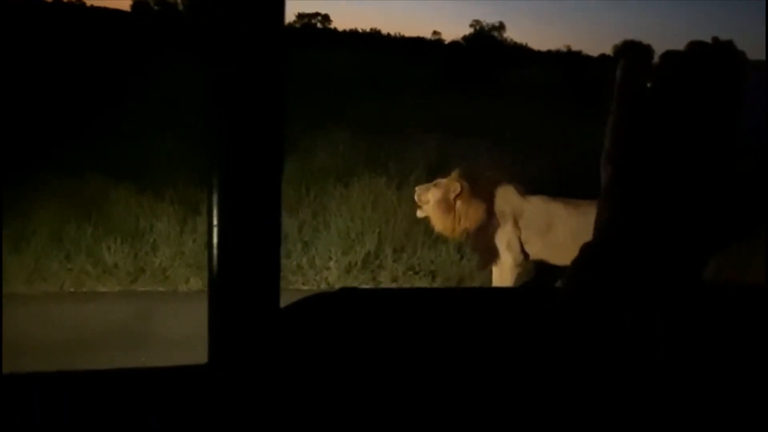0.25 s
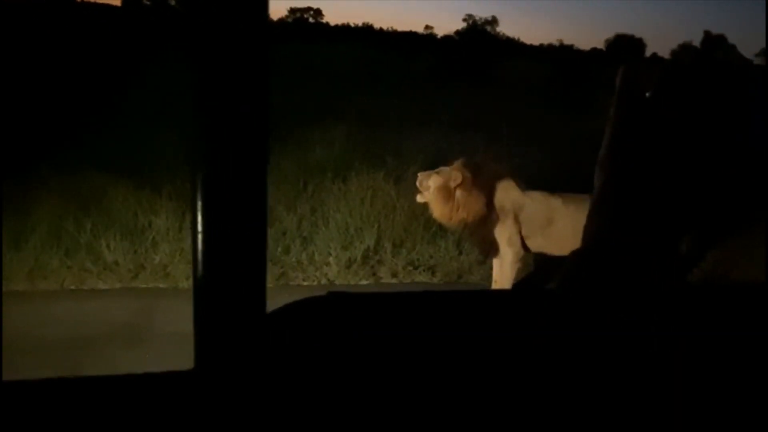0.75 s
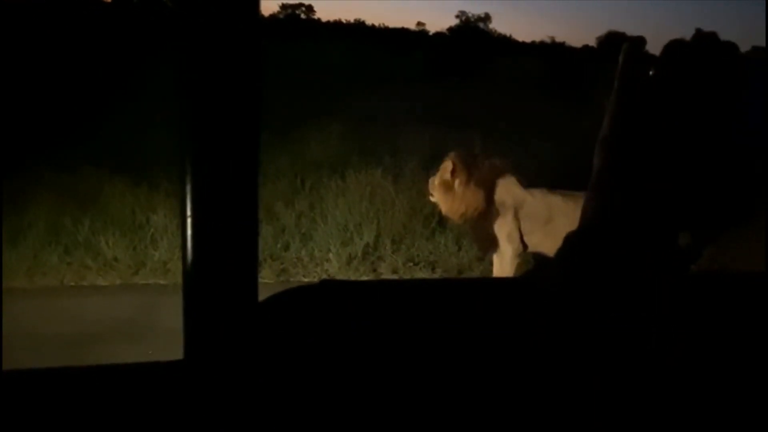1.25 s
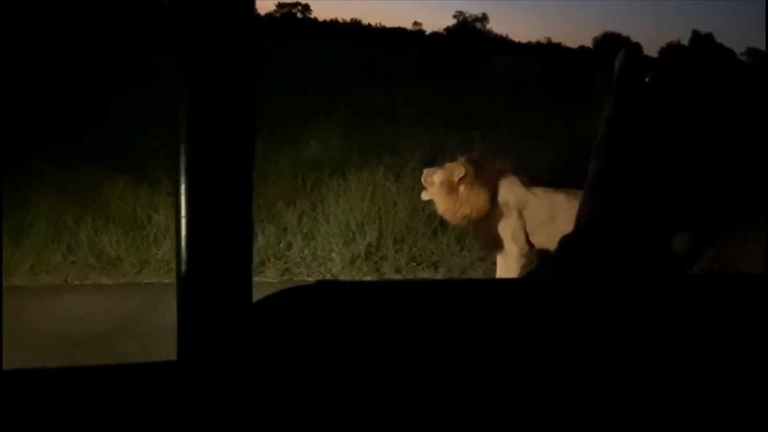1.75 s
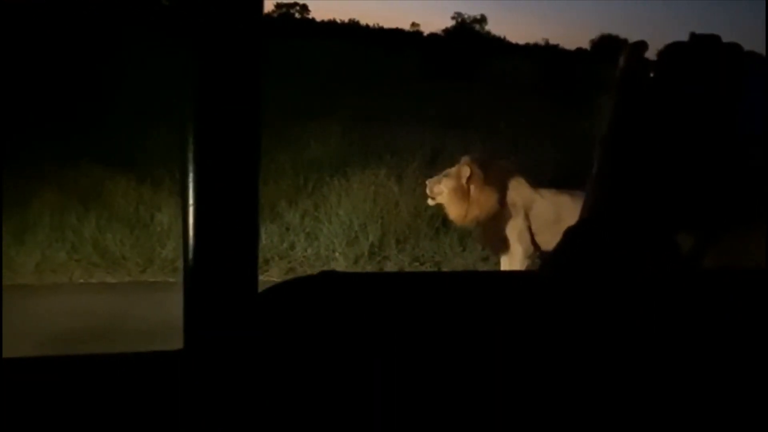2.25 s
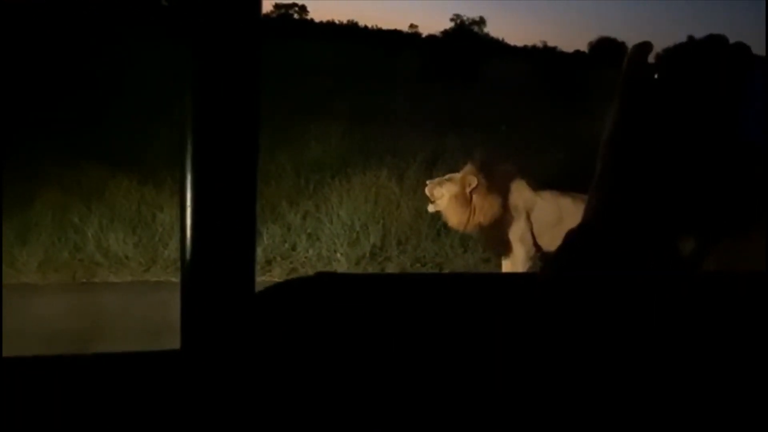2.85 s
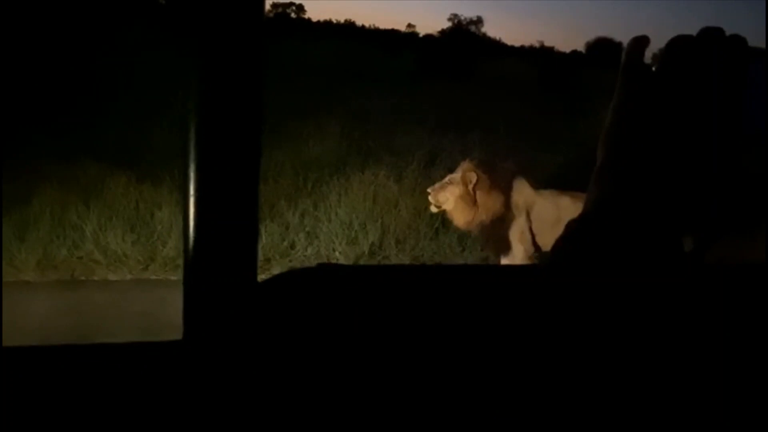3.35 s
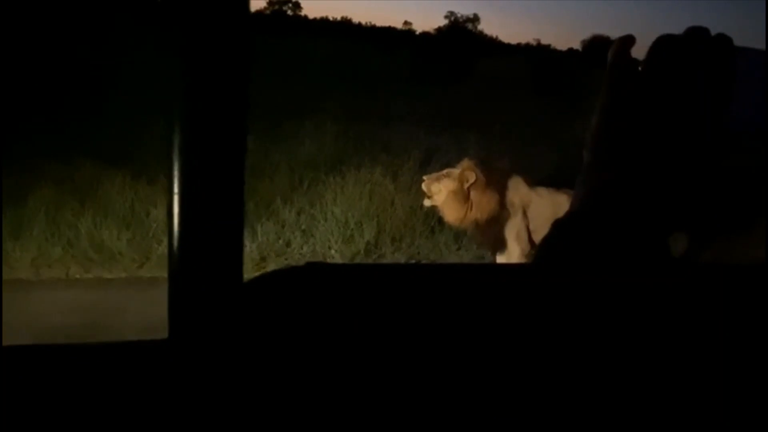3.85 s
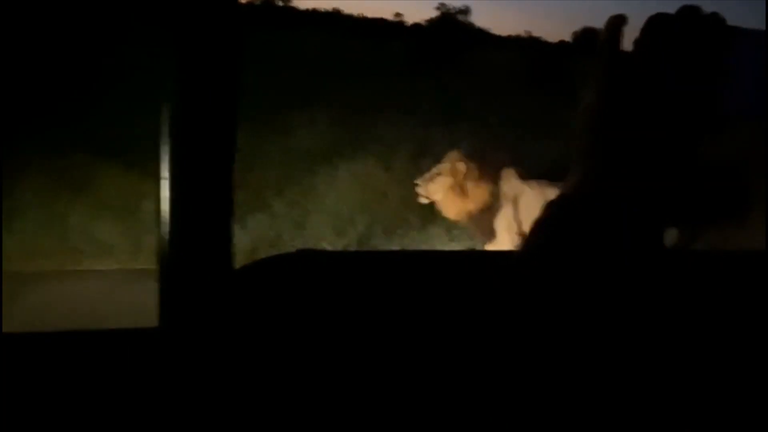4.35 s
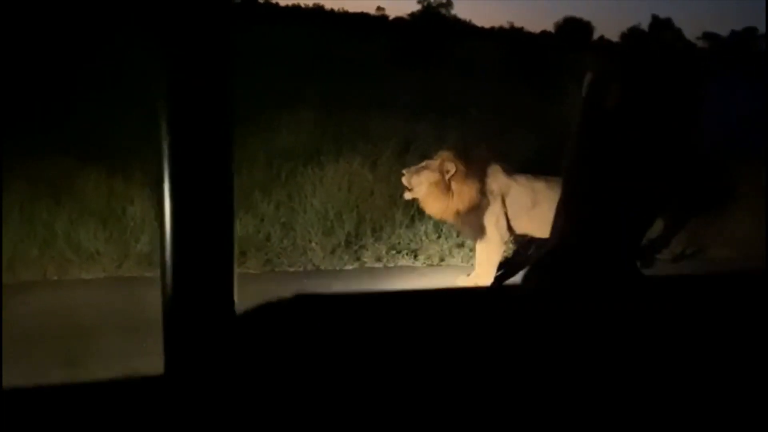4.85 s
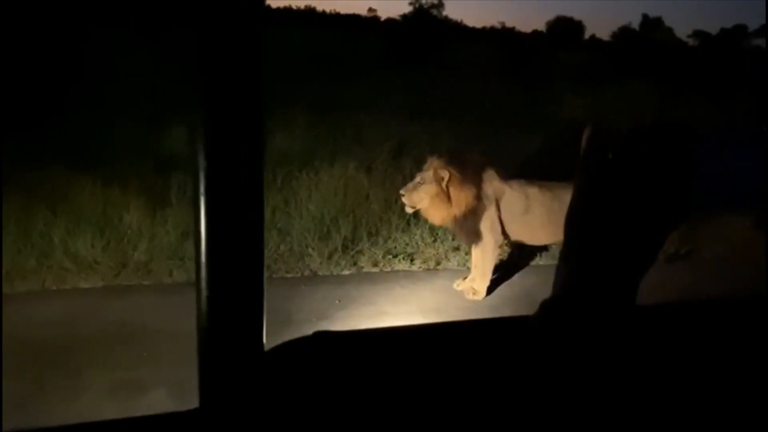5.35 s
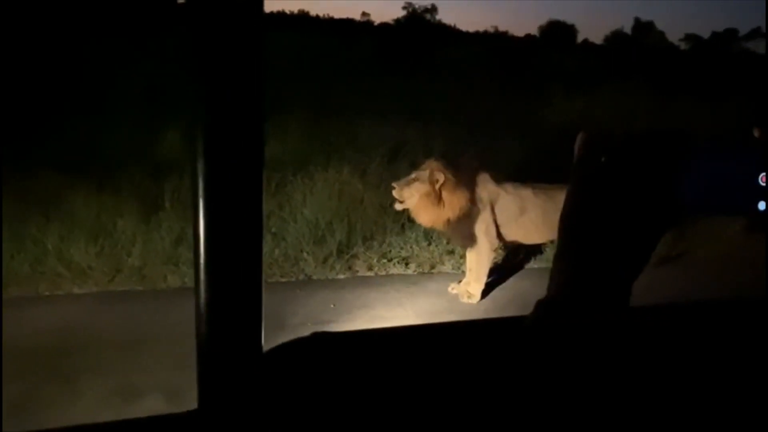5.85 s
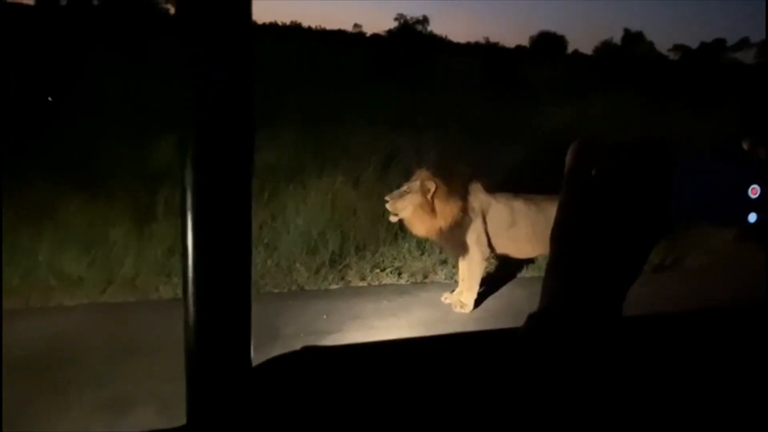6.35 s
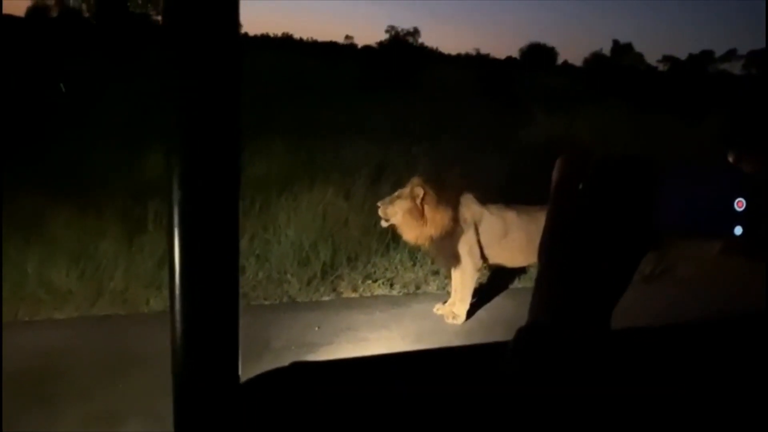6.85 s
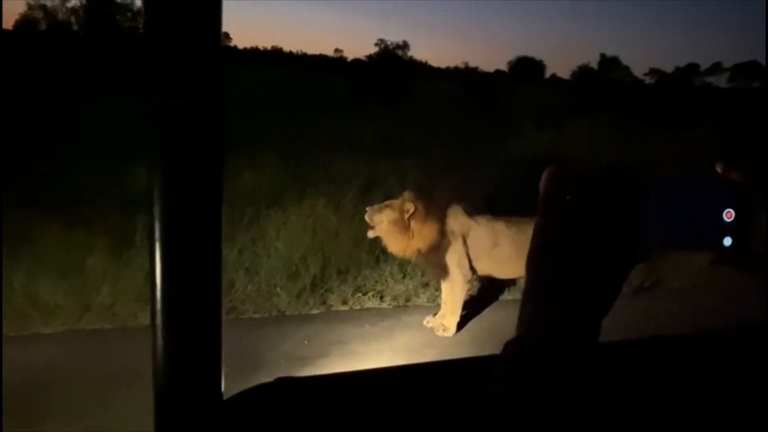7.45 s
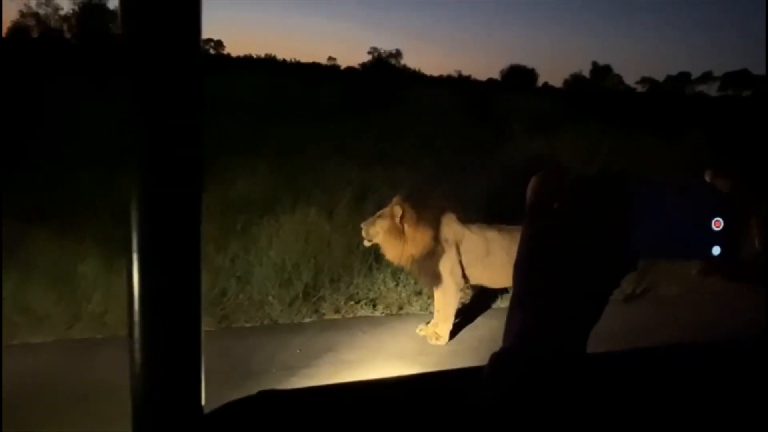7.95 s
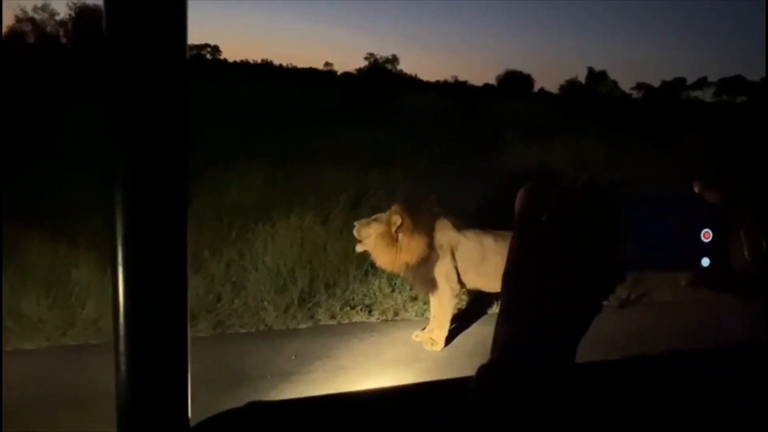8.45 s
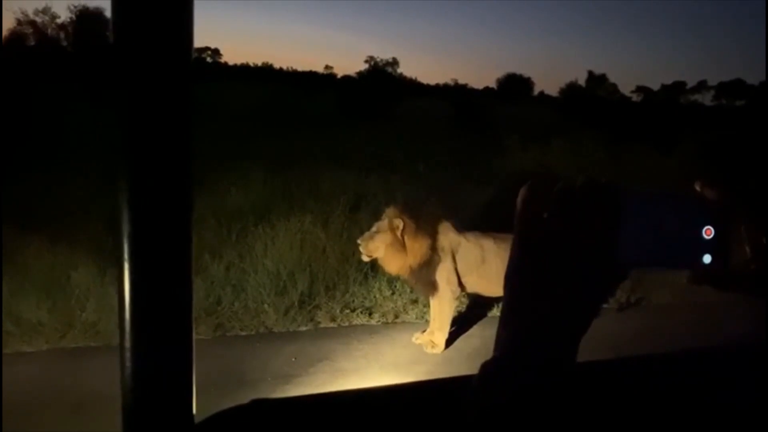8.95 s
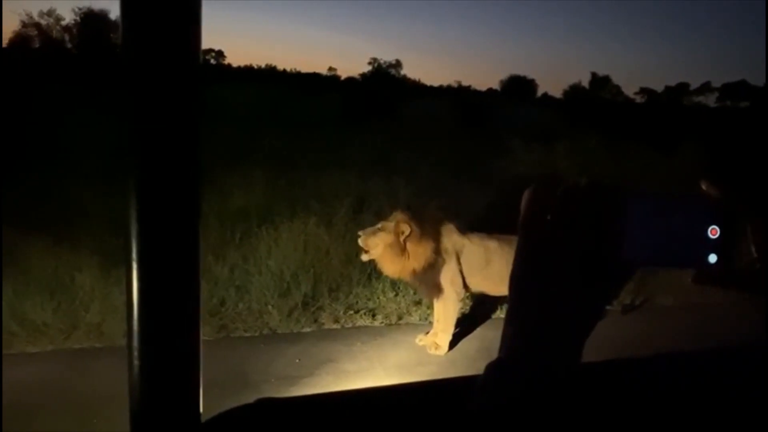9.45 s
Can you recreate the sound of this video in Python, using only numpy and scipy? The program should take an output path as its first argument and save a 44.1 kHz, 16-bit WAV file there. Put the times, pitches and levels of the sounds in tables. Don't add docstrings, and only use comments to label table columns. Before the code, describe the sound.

A male lion close by at dusk gives two long moaning roars, then eight short hoarse grunts, with whistling breaths between and faint crickets.

```python
import sys
import numpy as np
from scipy import signal
from scipy.fft import rfft, irfft, next_fast_len
from scipy.io import wavfile
from scipy.ndimage import uniform_filter1d

SR = 44100
rng = np.random.default_rng(int(sys.argv[2]) if len(sys.argv) > 2 else 0)


def store_wav(level_fs):
    pcm = np.round(np.clip(np.atleast_2d(level_fs), -1, 1) * 32767)
    wavfile.write(sys.argv[1], SR, pcm.T.astype(np.int16))


def makeup_ratio(level_db):
    decades = np.asarray(level_db, float) / 20
    return 10 ** decades


N = 428211

# start t/s, held t/s, top pitch f/Hz, rasp level/dB, dying rate/(dB/s)
CALLS = [
    (.26, 0.6, 173.7, -42, 229.5),
    (1.63, 0.4, 150.6, -43, 156.5),
    (2.8, 0.23, 143.8, -39, 168),
    (3.71, 0.19, 144.7, -38, 202.5),
    (4.649, 0.22, 140.7, -37, 187),
    (5.62, 0.19, 133.1, -33, 191),
    (6.48, 0.16, 131, -34, 219.5),
    (7.43, 0.18, 139.5, -36, 125),
    (8.41, .165, 130.3, -37.5, 129),
    (9.4, .15, 129.9, -34.5, 119.5),
]
# multiple of the pitch, level/dB
FOLD_OVERTONES = [(2, -11), (3, 0), (4, 0), (5, -9), (6, -12), (7, -8), (8, -11), (9, -14)]
# f/Hz, level/dB
THROAT_RESPONSE = [(150, -24.5), (205, 5.5), (290, -11), (350, -2), (450, -3.5), (540, -8.5), (620, 1.5),
                   (700, -12.5), (765, -2), (845, -24.5), (905, -11), (990, -19.5), (1140, -4.5),
                   (1360, -18.5), (1700, -20.5), (2400, -63.5)]
# f/Hz, density level/(dB per Hz)
RASP_SPECTRUM = [(1000, -29), (1700, -5), (2360, -3), (2740, -9.5), (4260, -13), (6970, -16), (8770, -13.5),
                 (10900, -18), (12100, -37.5), (15700, -67), (22000, -120)]
# f/Hz, width/Hz, level/dB
RASP_RESONANCES = [(2014, 70, 1), (2394, 50, 2), (2810, 21, -1.5), (3520, 31, 3.5), (3680, 48, 5),
                   (5100, 230, 1.5), (6185, 22, -5), (6970, 630, 0.5)]
# fullest t/s, level/dB, swell t/s
BREATHS = [
    (.166, -48.5, 0.72),
    (1.546, -47.5, 0.59),
    (2.698, -50, .17),
    (3.594, -53.5, .08),
    (4.53, -50, 0.099),
    (5.57, -51, 0.22),
    (6.396, -55.5, .12),
    (7.269, -58, 0.23),
    (8.304, -57, .085),
    (9.258, -57.5, .06),
]
# f/Hz, width/Hz, level/dB
INHALE_RESONANCES = [(324, 330, -7), (440, 63, -1), (770, 40, 4), (1160, 50, 3), (1390, 60, -1),
                     (2100, 200, -12)]
# t/s, rumble level/dB, rise t/s, fall t/s
SEAT_SHIFTS = [(.16, -40, .25, 0.22), (1.0, -43.5, 0.043, .22), (1.17, -46.5, .05, 0.26),
               (1.566, -37.5, .25, 0.065), (2.749, -49.5, .25, .15), (3.259, -31.5, 0.21, 0.73),
               (4.599, -49, 0.18, 0.07), (5.6, -59, .15, 0.034), (6.95, -50, 0.12, .4),
               (7.38, -48, 0.26, .1), (9.098, -51, .1, 0.086)]
# t/s, level/dB, rise t/s, fall t/s
RUSTLES = [
    (.93, -60, .02, 0.2),
    (1.145, -61, .012, .03),
    (1.16, -65, .12, 0.32),
    (1.352, -56, .08, 0.035),
    (4.098, -63.5, .01, .3),
    (4.214, -56.5, .06, .13),
    (5.562, -63.5, .02, 0.05),
]
# f/Hz, density level/(dB per Hz)
CLOTH_SPECTRUM = [(150, -34), (250, -5.5), (1210, -10), (1350, -6.5), (2160, -14), (2350, -10), (2990, -12),
                  (6960, -18.5), (8450, -22.5), (9780, -21.5), (12100, -24.5), (15700, -58.5),
                  (22000, -120)]
# t/s, peak level/dB, f/Hz, t60/s
KNOCKS = [(1.019, -40.5, 352.4, 0.47), (1.145, -37.5, 512, 0.2), (1.214, -41.5, 500, 0.24),
          (1.334, -38, 305, 0.13), (2.702, -47, 741, 0.27), (3.443, -37.5, 315, 0.072),
          (4.096, -58, 288, 0.45), (5.557, -46.5, 597, 0.29), (6.118, -46.5, 404, 0.3),
          (7.286, -48.5, 642, 0.54), (9.069, -51.5, 174, 0.3)]
# middle t/s, length t/s, level/dB
CRICKET_BOUTS = [(0.106, 0.26, -64.5), (1.051, 0.52, -65), (2.709, .35, -62), (3.25, 0.37, -66.5),
                 (3.597, 0.24, -65), (4.569, 0.3, -61.5), (5.499, 0.4, -63.5), (6.399, .3, -62),
                 (6.838, .2, -63), (7.268, 0.18, -62.5), (7.85, .15, -68), (8.358, 0.18, -62.5),
                 (9.315, 0.27, -62.5)]
# t/s, length t/s, start f/Hz, middle f/Hz, end f/Hz
BIRD_WHISTLES = [
    (3.278, 0.099, 3590, 3660, 3680),
    (3.45, 0.25, 3390, 3200, 3261),
    (3.627, .12, 2700, 2900, 3080),
    (6.905, .16, 2980, 3260, 3210),
    (7.142, 0.094, 3086, 2790, 3095),
    (8.04, 0.11, 2650, 2910, 2984),
]
BIRD_LEVELS = [-80, -80, -79, -79, -73, -86]
# f/Hz, density level/(dB per Hz)
AIR_SPECTRUM = [(120, -26.5), (200, -4.5), (541, -16.5), (1150, -22), (3280, -26.5), (4950, -15),
                (5680, -31.5), (6740, -23.5), (7730, -50), (10500, -42), (12100, -48.5), (15700, -79),
                (22000, -120)]
# f/Hz, left-right level/dB
PORT_LEAN = [(200, 0), (350, -.4), (620, -1.3), (1120, -3.2), (2010, -.5), (3610, 2.3), (6480, 1.5),
             (9000, 0)]
# f/Hz, side-mid level/dB
PORT_WIDTH = [(30, -26.5), (80, -46), (170, -40.5), (330, -15), (700, -10.5), (1200, -8), (2300, -5.5),
              (5000, -2.5), (7600, -11.5), (8700, 6), (9500, -7.5), (11500, -15)]
# f/Hz, level/dB
SUM_DIP = [(7600, 0), (8300, -8), (8800, -13.5), (9300, -7), (9700, 0)]


def call(start, held_s, top_hz, rasp_db, dying):
    t = np.arange(0, held_s + 0.36, 1 / SR)
    hz, (chest_db, flutter_db, throat_db, rasp_db) = effort(t, held_s, top_hz, rasp_db, dying)
    held_rough = .79 - .005 * (top_hz - 130)
    hoarse_s, break_s = .74 * held_s, held_s + .03
    turns_s = [hoarse_s - .03, hoarse_s + .03, break_s + .001, break_s + .03]
    rough = np.interp(t, turns_s, [held_rough, .89, .92, 1])
    rough = np.maximum(rough, np.interp(t, [.09, .15], [.84, 0]))
    broken = np.clip((t - break_s) / .02 + .5, 0, 1)
    angle = 2 * np.pi * np.cumsum(hz * (1 + 0.029 * rough * wander(len(t), size=150))) / SR
    slaps = fold_slaps(len(t))
    puffs = air_puffs(angle, slaps, broken)
    throat = throat_sound(angle, rough, held_rough, puffs)
    layers = makeup_ratio(chest_db) * chest_sound(angle, rough, slaps, broken)
    layers += makeup_ratio(flutter_db) * steadied(flutter_sound(slaps), size=1800)
    layers += makeup_ratio(throat_db) * steadied(throat, size=900)
    layers += makeup_ratio(rasp_db) * steadied(rasp_sound(puffs, held_rough), size=900)
    return start, layers * signal.windows.tukey(len(t), .04)


def effort(t, held_s, top_hz, rasp_db, dying):
    start_hz, end_hz, glide_from_s = 106, 122.25, .055
    arrive_s = glide_from_s + .05 + 0.0013 * (top_hz - start_hz)
    up = np.sin(np.pi / 2 * np.clip((t - glide_from_s) / (arrive_s - glide_from_s), 0, 1))
    down = np.clip((t - arrive_s) / (held_s + .03 - arrive_s), 0, 1) ** 1.6
    hz = start_hz + (top_hz - start_hz) * up - (top_hz - end_hz) * down

    after = np.maximum(t - held_s, 0)
    fade_db = -dying * after
    shut_db = -502 * after ** 2
    spent_db = -146 * np.maximum(after - 0.14, 0)
    hoarse = np.clip((t / held_s - .74) / (1 - .74) + .5, 0, 1)
    chest = climb(t, depth_db=42.8, climb_s=.16) + fade_db + spent_db

    top_s, held_db, top_db = held_s + 0.046, -42.5, -16.5
    loosened = np.clip(1 - (top_s - t) / 0.24, 0, 1)
    flutter = held_db + (top_db - held_db) * loosened + climb(t, 12, .06)
    flutter = flutter - 0.61 * dying * np.maximum(t - top_s, 0) + spent_db

    throat_climb_s = .11
    settled = 1 - np.exp(-np.maximum(t - throat_climb_s, 0) / 0.027)
    throat = -9 + climb(t, 48.8, throat_climb_s) - 4 * settled
    throat = throat + 0.91 * fade_db + shut_db
    rasp = rasp_db + climb(t, depth_db=47, climb_s=0.13) + 2.5 * hoarse * settled
    rasp = rasp + 0.65 * fade_db + shut_db
    return hz, -7.5 + np.array([chest, flutter, throat, rasp])


def fold_slaps(count):
    rate_hz = 40 * makeup_ratio(3.0 * wander(count, size=900))
    slaps = np.diff(np.floor(np.cumsum(rate_hz) / SR), prepend=0)
    return slaps * makeup_ratio(2.1 * rng.standard_normal(count))


def air_puffs(angle, slaps, broken):
    slap_gate = signal.lfilter([1], [1, -np.exp(-1 / (0.0024 * SR))], slaps)
    gate = (1 - broken) * (.5 + 0.16 * np.cos(angle)) + 1.2 * broken * slap_gate + 0.56
    return evened(gate * rng.standard_normal(len(angle)))


def chest_sound(angle, rough, slaps, broken):
    growl = resonate(resonate(resonate(slaps, 126, 41), 120, 49), 140, 110)
    tone = np.cos(angle) * makeup_ratio(2 * rough ** 2 * wander(len(angle), size=450))
    return (1 - broken) * np.sqrt(2) * tone + broken * steadied(growl, size=1800)


def flutter_sound(slaps):
    push = uniform_filter1d(slaps, 200) * 200 + .1 * rng.standard_normal(len(slaps))
    return resonate(resonate(push, 73, 30), 64, 40)


def throat_sound(angle, rough, held_rough, puffs):
    count = len(angle)
    folds = np.zeros(count)
    for k, db in FOLD_OVERTONES:
        swell = makeup_ratio(db + 6 * rough * wander(count, size=round(1900 - 1500 * held_rough)))
        slip = .21 * k * rough ** 2 * wander(count, size=500) + 2 * np.pi * rng.random()
        folds += swell * np.cos(k * angle + slip)
    throat = colour(np.sqrt(1 - rough ** 2) * evened(folds) + rough * puffs, THROAT_RESPONSE)
    return throat + 0.55 * (held_rough - .5) * resonate(throat, 1500, 450)


def rasp_sound(puffs, held_rough):
    hiss = puffs * makeup_ratio(2.0 * wander(len(puffs), size=250))
    rings = np.zeros(len(puffs))
    for hz, width, db in RASP_RESONANCES:
        rings += makeup_ratio(db + 6 * wander(len(puffs), size=1200)) * resonate(hiss, hz, width)
    return colour(hiss + 2.2 * (1 - held_rough) * rings, RASP_SPECTRUM)


def breath(s, peak_db, swell_s, call_s):
    start = max(s - min(swell_s, .18), 0)
    t = np.arange(start, call_s, 1 / SR)
    air_db = peak_db + tent(t, s, swell_s / 34, 1 / 54)
    air_db = air_db - 10 * np.clip(1 - (call_s - t) / 0.15, 0, 1)
    noise = rng.standard_normal(len(t))
    narrowing = 1.05 - 0.53 * (t - start)
    air = np.zeros(len(t))
    for k, (hz, width, db) in enumerate(INHALE_RESONANCES):
        air += makeup_ratio(db) * evened(resonate(noise, hz * narrowing, width)) * (-1) ** k
    air = colour(air, [(100, -28.0), (300, 2.5), (1700, -1), (3500, -15)])
    return start, makeup_ratio(air_db) * steadied(air, size=1500) * signal.windows.tukey(len(t), .2)


def bush(x):
    t = np.arange(30000) / SR
    tail = rng.standard_normal(len(t)) * makeup_ratio(-60 * t / 0.41) * (t > .03)
    tail = colour(tail, [(150, -30.5), (300, 5.5), (700, -17), (2000, -6.5)])
    return makeup_ratio(-24) * signal.oaconvolve(x, tail / np.linalg.norm(tail))[:N]


def cabin_boom(t):
    rings = [-48.5 + tent(t, s + held + 0.1, 0.0024, 1 / 39) for s, held, *_ in CALLS]
    hums = [3.5 + db + 34 * tent(t, s, swell, .3) for s, db, swell in BREATHS]
    boom_db = summed([-68 + 0 * t] + rings + hums) + 3 * wander(len(t), size=12)
    noise = rng.standard_normal(N)
    boom = colour(resonate(noise, 134, 26) + .1 * noise,
                  [(60, -12), (100, 0), (160, 0), (220, -16), (500, -30), (1000, -60)])
    return makeup_ratio(np.interp(np.arange(N) / SR, t, boom_db)) * steadied(boom, size=2500)


def seat_rumble(t):
    shifts = [db + 25 * tent(t, s, up, down) for s, db, up, down in SEAT_SHIFTS]
    rumble_db = summed([-64.5 + 0 * t] + shifts)
    noise = rng.standard_normal(N)
    rumble = resonate(resonate(noise, 59, 48), 110, 95)
    rumble += 0.044 * resonate(resonate(resonate(noise, 280, 110), 200, 130), 200, 140)
    return makeup_ratio(np.interp(np.arange(N) / SR, t, rumble_db)) * steadied(rumble, size=2500)


def knock(s, peak_db, hz, t60):
    t = np.arange(6000) / SR
    ring = .3 * np.sin(2 * np.pi * hz * t) * makeup_ratio(-60 * t / .05)
    puff = evened(resonate(resonate(rng.standard_normal(len(t)), hz, hz), hz, 1.3 * hz))
    puff = puff * makeup_ratio(-60 * t / t60)
    return s, makeup_ratio(peak_db - 5) * (ring + puff) * np.minimum(t / .003, 1)


def rustle(s, peak_db, rise_s, fall_s):
    t = np.arange(-rise_s, fall_s, 1 / SR)
    level_db = peak_db + 20 * tent(t, 0, rise_s, fall_s)
    grains = rng.standard_normal((2, len(t))) * makeup_ratio(2.0 * np.minimum(rng.exponential(1, len(t)), 4))
    cloth = evened(colour(grains + .5 * grains[::-1], CLOTH_SPECTRUM))
    return s - rise_s, makeup_ratio(level_db + 7) * cloth * signal.windows.tukey(len(t), .04)


def crickets():
    t = np.arange(N) / SR
    level_db = -69 + 0 * t
    for s, length, db in CRICKET_BOUTS:
        level_db = np.maximum(level_db, db - 4.5 * (2 * (t - s) / length) ** 2)
    noise = rng.standard_normal((2, 2, N))
    stroke_hz = 50 + 1.0 * wander(N, size=9000)
    strokes = (.5 + .5 * np.cos(2 * np.pi * np.cumsum(stroke_hz) / SR)) ** 1.5
    wings = resonate(resonate(noise[0] + noise[0, ::-1] * 0.66, 4700, 350), 4700, 600)
    near = evened(wings * strokes)
    far = evened(colour(noise[1], [(3000, -39.5), (4000, -9.5), (4500, 1), (5150, -2.5), (5350, -3),
                                   (5600, -40.0)]))
    bout = np.clip((level_db + 71) / 6, 0, 1)
    return makeup_ratio(level_db + np.array([[1.1], [-1.1]])) * (.5 * bout * near + .75 * far)


def bird(start, length, first_hz, middle_hz, last_hz, db):
    t = np.arange(0, length, 1 / SR)
    hz = np.interp(t, [0, length / 2, length], [first_hz, middle_hz, last_hz])
    whistle = np.sin(2 * np.pi * np.cumsum(uniform_filter1d(hz, 400)) / SR)
    level = np.sqrt(2) * makeup_ratio(db + 3.0 * wander(len(t), size=500))
    return start, level * whistle * signal.windows.tukey(len(t), .3)


def open_air():
    return makeup_ratio(-70 + 3.0) * evened(colour(rng.standard_normal((2, N)), AIR_SPECTRUM))


def ports(mid):
    length = next_fast_len(N)
    hz = np.fft.rfftfreq(length, 1 / SR)
    echoes = rfft(rng.standard_normal(2500) * np.exp(-np.arange(2500) / 500.), length)
    lean = np.tanh(read(PORT_LEAN, hz) * np.log(10) / 40)
    loose = np.sqrt(np.maximum(makeup_ratio(read(PORT_WIDTH, hz)) ** 2 - lean ** 2, 0))
    scatter = np.sin(np.angle(echoes)) * np.interp(hz, [300, 1200, 2500], [.35, .6, 2.4])
    side = irfft((lean + loose * 1j * np.exp(1j * scatter)) * rfft(mid, length), length)[:N]
    return np.array([mid + side, mid - side])


def thinned(x):
    hz, _, z = signal.stft(x, SR, nperseg=1024, noverlap=512)
    power = uniform_filter1d(uniform_filter1d(abs(z) ** 2, 2, 1), 2, 0)
    weak = (power < .42 * uniform_filter1d(power, 24, 0)) & (hz[:, None] > 1500)
    return signal.istft(np.where(weak, .12 * z, z), SR, nperseg=1024, noverlap=512)[1][:N]


def evened(x):
    return x / np.sqrt(np.mean(x ** 2) + 1e-20)


def steadied(x, size):
    return x / np.sqrt(abs(uniform_filter1d(uniform_filter1d(x ** 2, size), size)) + 1e-12)


def wander(count, size):
    return evened(uniform_filter1d(uniform_filter1d(rng.standard_normal(count), size), size))


def read(points, hz):
    f, value = np.transpose(points)
    return np.interp(np.log(hz + 1), np.log(f + 1), value)


def colour(x, points):
    gain_db = np.maximum(read(points, abs(np.fft.fftfreq(8192, 1 / SR))), -100)
    log_gain = gain_db * np.log(10) / 20
    taps = np.fft.ifft(np.exp(np.conj(signal.hilbert(log_gain)))).real[:4096]
    taps = taps.reshape((1,) * (x.ndim - 1) + (-1,))
    return signal.oaconvolve(x, taps, axes=-1)[..., :x.shape[-1]]


def resonate(x, hz, width):
    r = np.exp(-np.pi * width / SR)
    if np.ndim(hz) == 0:
        return 2 * signal.lfilter([1 - r], [1, -r * np.exp(2j * np.pi * hz / SR)], x).real
    turn = np.exp(2j * np.pi * np.cumsum(hz) / SR)
    return 2 * (turn * signal.lfilter([1 - r], [1, -r], x / turn)).real


def climb(t, depth_db, climb_s):
    return -depth_db * np.clip(1 - t / climb_s, 0, 1) ** 2


def tent(t, s, rise_s, fall_s):
    return np.minimum((t - s) / rise_s, (s - t) / fall_s)


def summed(levels_db):
    return 10 * np.log10(np.sum(makeup_ratio(levels_db) ** 2, 0))


def add(mix, s, sound):
    part = mix[..., round(s * SR):][..., :sound.shape[-1]]
    part += sound[..., :part.shape[-1]]


def scene():
    voice, near = np.zeros(N), np.zeros((2, N))
    for row, inhale in zip(CALLS, BREATHS):
        add(voice, *call(*row))
        add(voice, *breath(*inhale, row[0]))
    coarse_t = np.arange(0, N + 400, 200) / SR
    cabin = cabin_boom(coarse_t) + seat_rumble(coarse_t)
    for row in KNOCKS:
        add(cabin, *knock(*row))
    for row in RUSTLES:
        add(near, *rustle(*row))
    for row, db in zip(BIRD_WHISTLES, BIRD_LEVELS):
        add(cabin, *bird(*row, db))
    return ports(voice + bush(voice) + cabin) + near + crickets() + open_air()


def top_cut(x):
    return signal.sosfilt(signal.butter(12, 12230, fs=SR, output="sos"), x)


def record(dry):
    mid = thinned(colour((dry[0] + dry[1]) / 2, SUM_DIP))
    side = (dry[0] - dry[1]) / 2
    ceiling = 1.15
    mix = ceiling * np.tanh(np.array([mid + side, mid - side]) / ceiling)
    return top_cut(mix)


dry = scene()
out = record(dry)
store_wav(out)
```